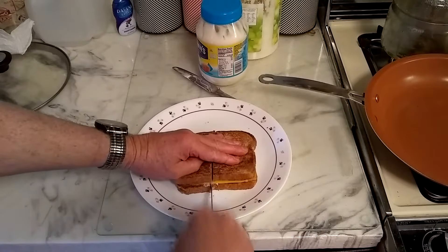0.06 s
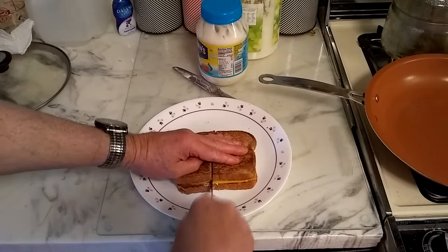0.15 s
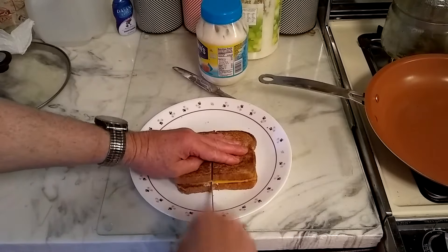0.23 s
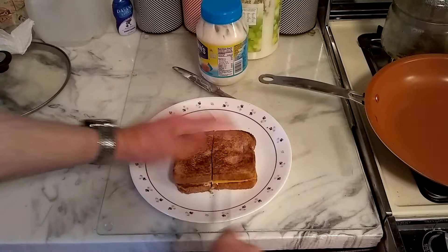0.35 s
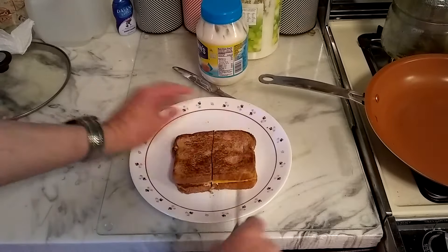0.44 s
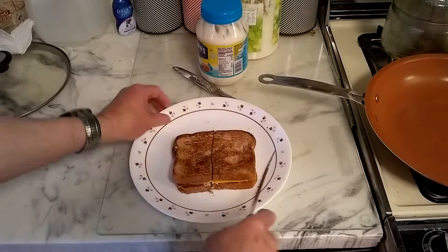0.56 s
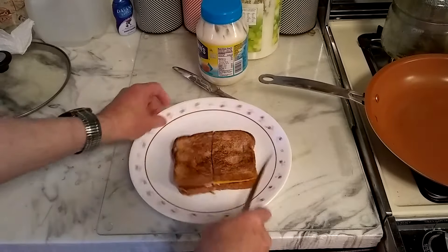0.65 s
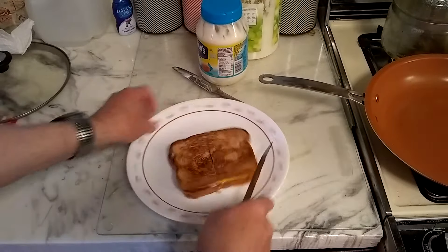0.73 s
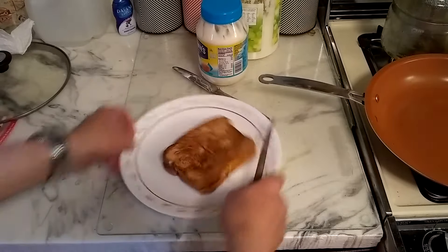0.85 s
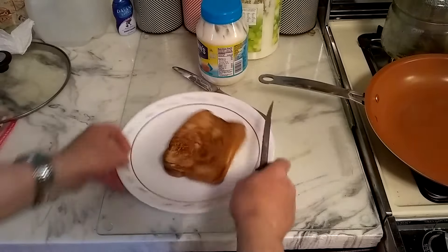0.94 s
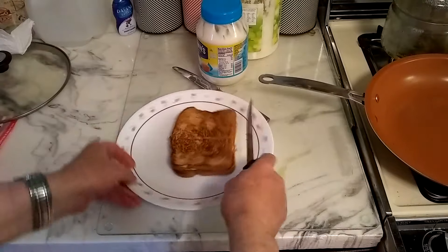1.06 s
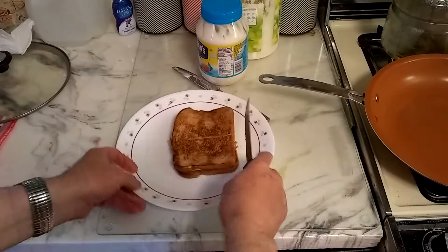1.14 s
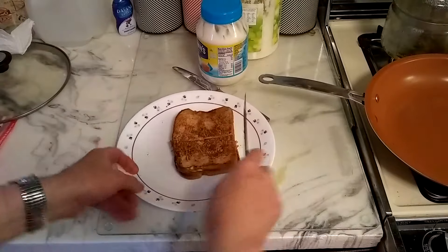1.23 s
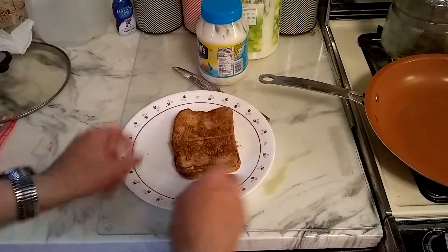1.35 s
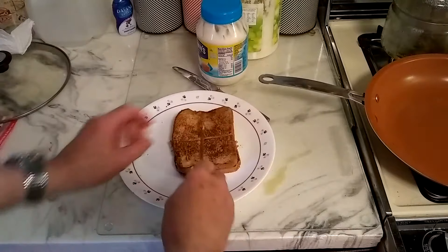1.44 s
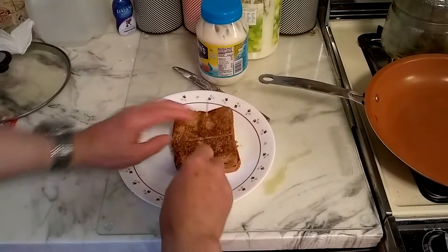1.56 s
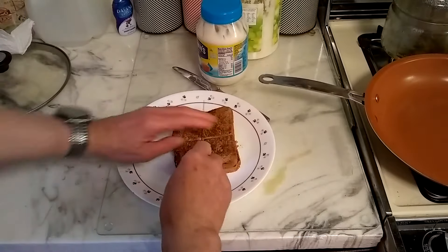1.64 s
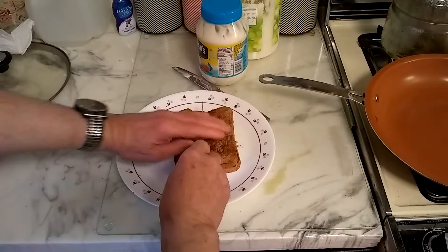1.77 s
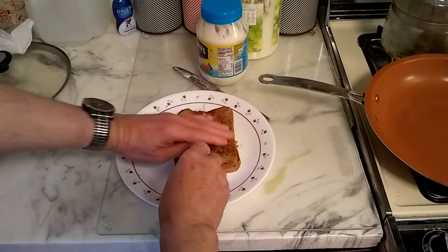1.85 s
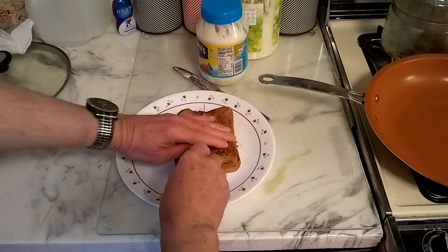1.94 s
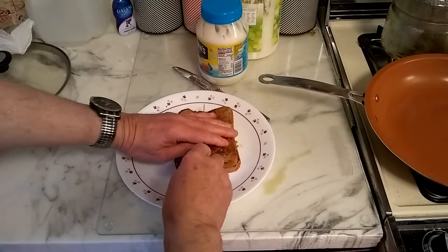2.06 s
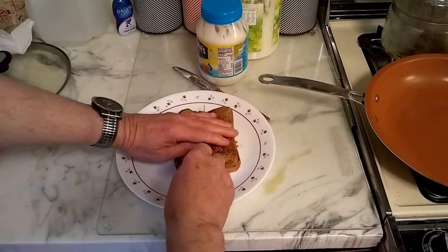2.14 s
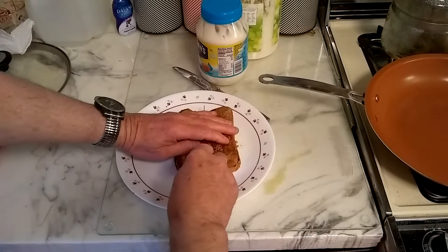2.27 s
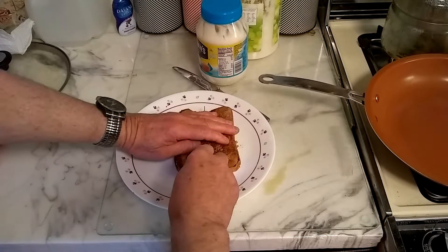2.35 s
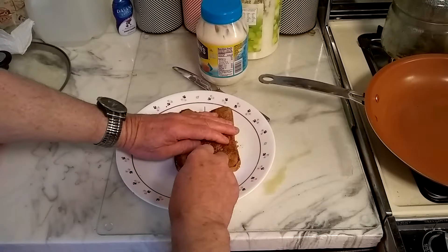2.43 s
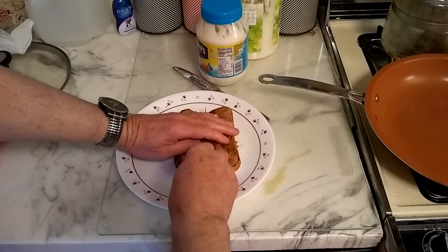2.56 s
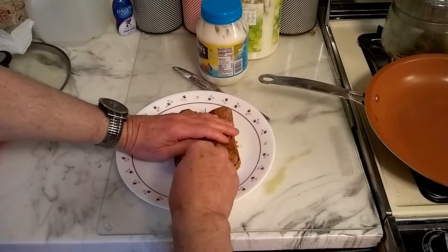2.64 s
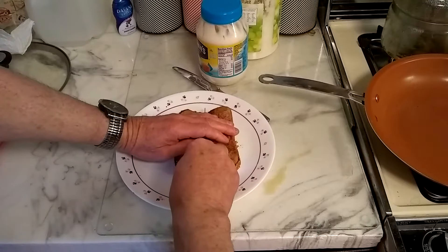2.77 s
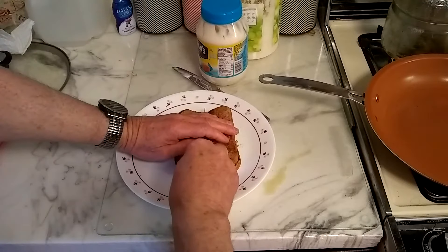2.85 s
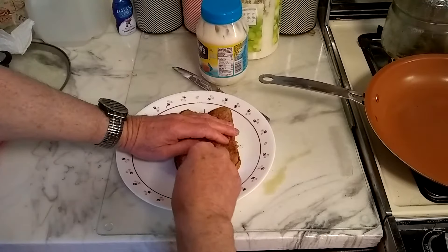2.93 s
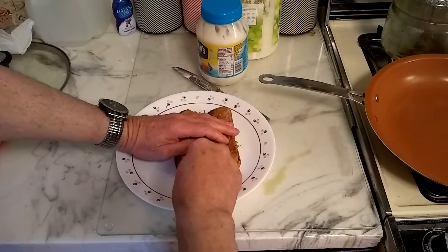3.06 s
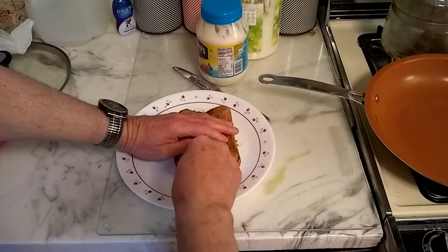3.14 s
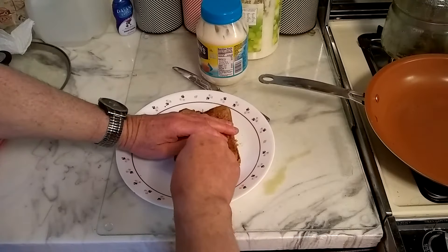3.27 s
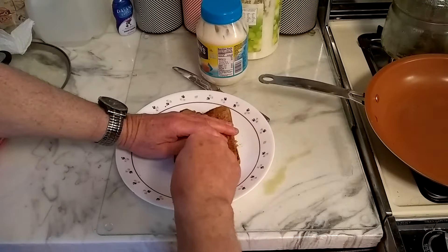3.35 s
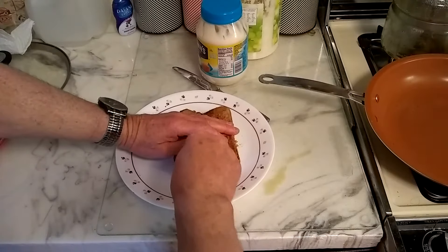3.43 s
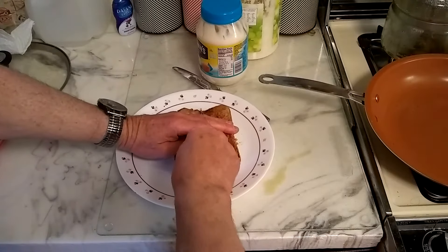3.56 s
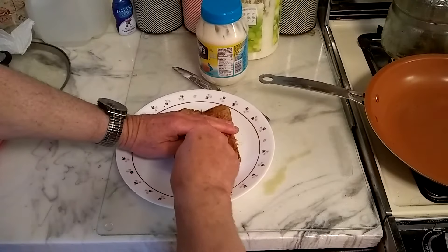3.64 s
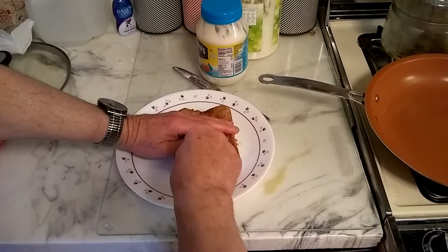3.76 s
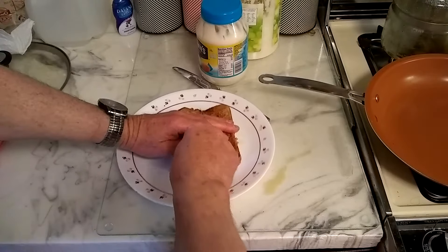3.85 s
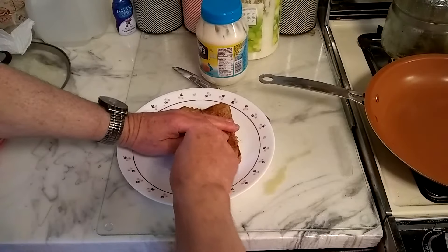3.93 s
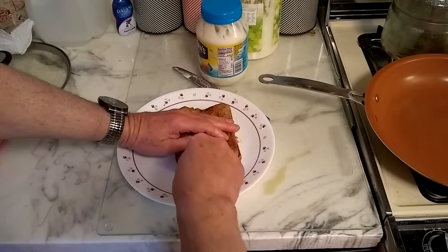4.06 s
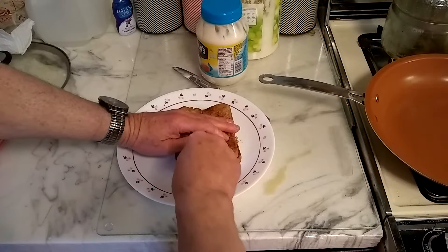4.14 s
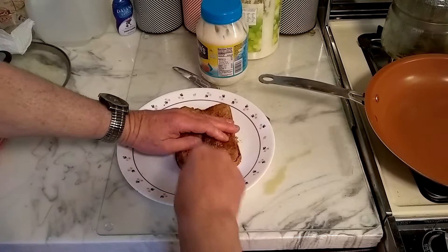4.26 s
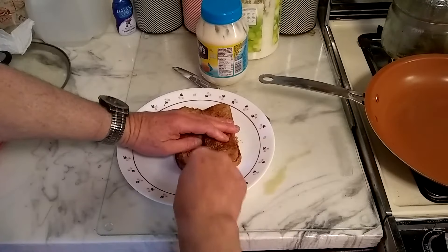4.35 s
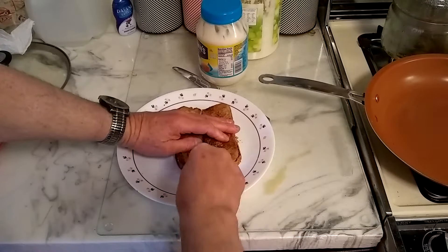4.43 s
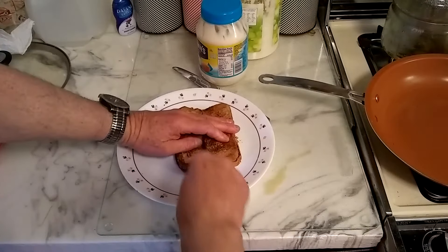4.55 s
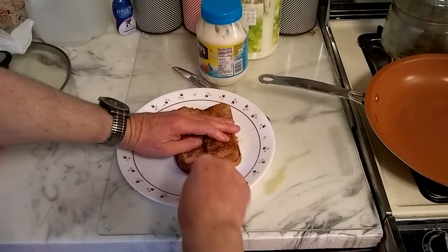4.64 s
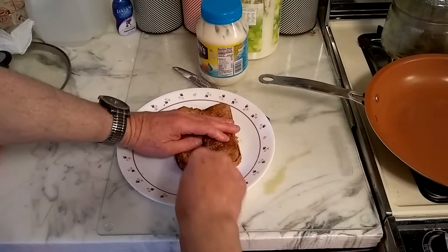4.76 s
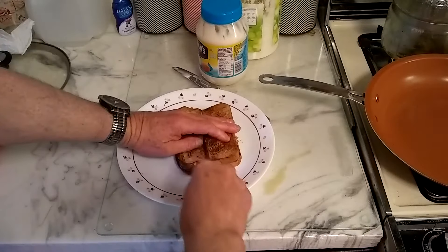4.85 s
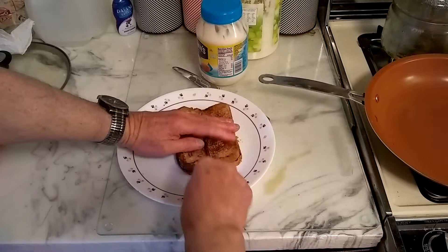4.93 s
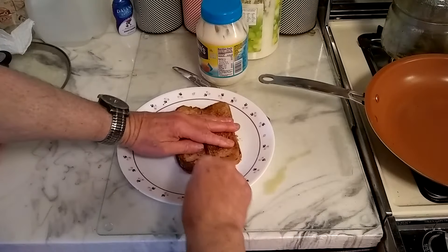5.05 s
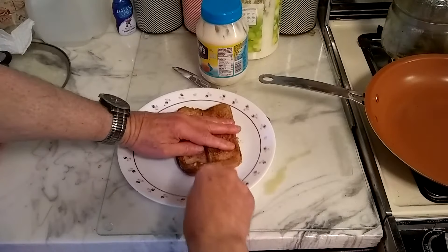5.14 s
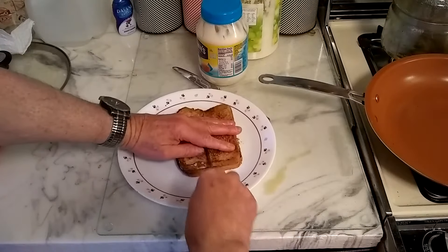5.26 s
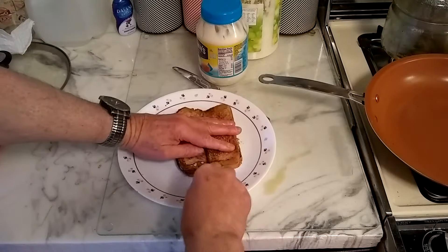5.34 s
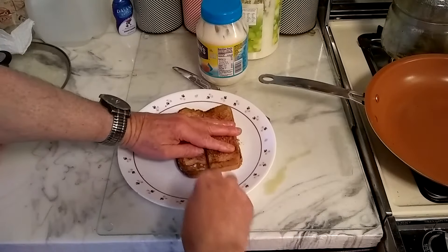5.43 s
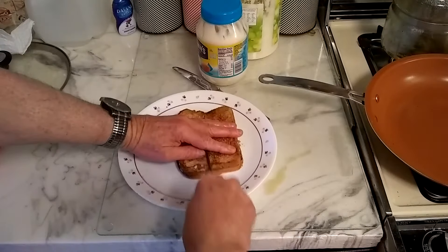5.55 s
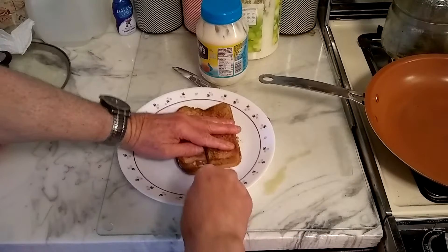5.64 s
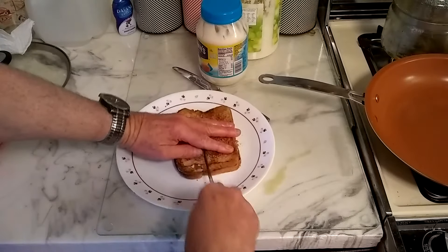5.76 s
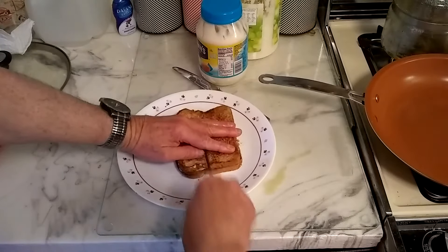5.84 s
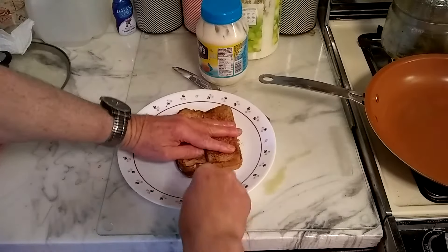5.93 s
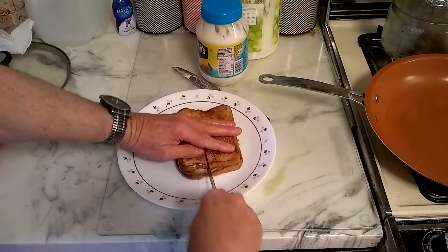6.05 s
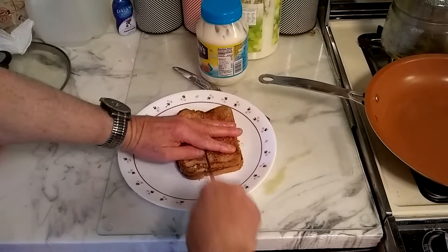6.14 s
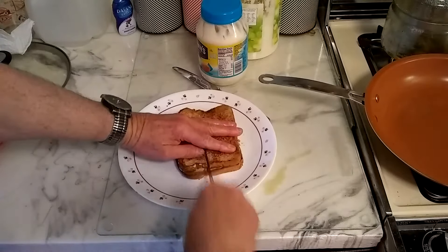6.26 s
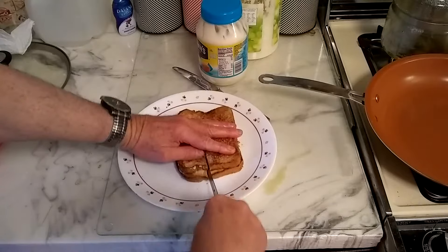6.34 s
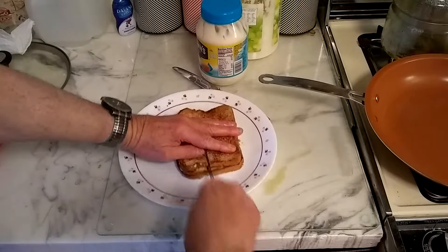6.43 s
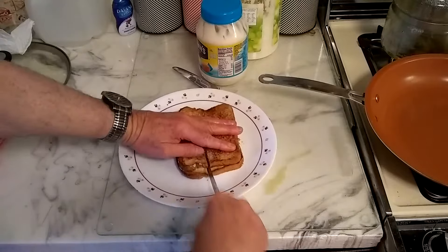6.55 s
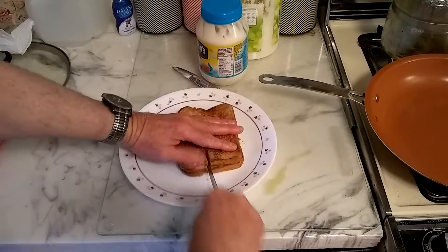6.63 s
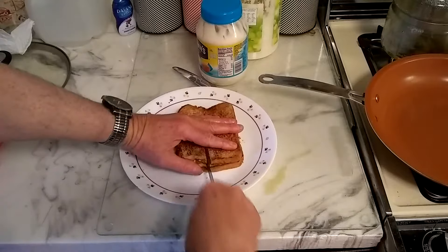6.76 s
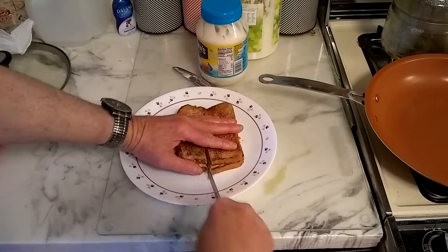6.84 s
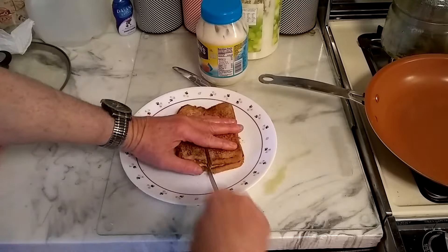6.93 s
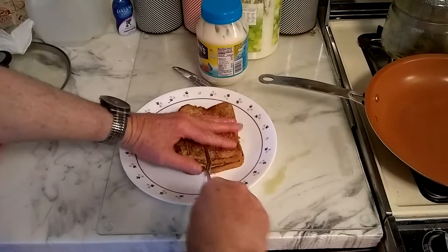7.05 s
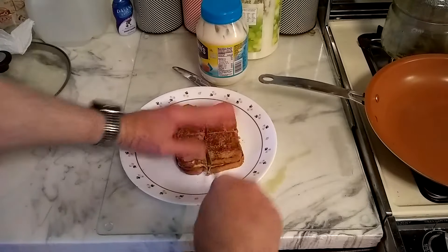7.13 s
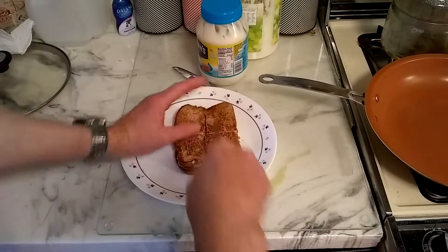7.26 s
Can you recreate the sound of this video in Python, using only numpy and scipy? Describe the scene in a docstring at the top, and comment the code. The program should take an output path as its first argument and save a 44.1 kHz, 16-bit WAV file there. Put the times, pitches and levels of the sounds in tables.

```python
"""A table knife scrapes twice across a toasted sandwich and ticks sharply on the thin plate, exciting its
modes. From 0.6 to 1.2 s the plate is turned on the stone counter, its foot ring dragging over grit.
After a lull, sawing resumes near 2.5 s and grows louder: crumbs fracture, the blade ticks on the plate,
and hand and bread damp the ringing. A last loud tick falls at 6.6 s. Throughout, an appliance hums in
the small kitchen, and a pair of microphones with gain control listens."""
import sys
import numpy as np
from scipy import signal
from scipy.fft import rfft, irfft, next_fast_len
from scipy.io import wavfile
from scipy.ndimage import uniform_filter1d

SR = 44100
rng = np.random.default_rng(int(sys.argv[2]) if len(sys.argv) > 2 else 0)


def generate_wav(signal):
    """Clip the signal to [-1, 1] and save it as 16-bit WAV at the path in sys.argv[1]."""
    frames = np.transpose(np.atleast_2d(signal))
    scaled = np.clip(frames, -1, 1) * 32767
    pcm = np.round(scaled).astype(np.int16)
    wavfile.write(sys.argv[1], SR, pcm)


N = 321489

# saw strokes: (midpoint [s], duration [s], scratch level [dB])
SAW_STROKES = [(0.057, 0.1, -52.5), (0.174, 0.093, -46.5), (1.96, 0.017, -64), (2.49, 0.16, -64),
               (2.687, 0.096, -62), (2.872, 0.14, -62.5), (3.103, 0.18, -58.5), (3.288, 0.086, -63),
               (3.464, 0.16, -59.5), (3.647, 0.15, -59.5), (3.768, 0.049, -50.5), (3.949, 0.2, -60),
               (4.085, 0.086, -54), (4.214, 0.13, -54), (4.375, 0.1, -51), (4.474, 0.16, -59),
               (4.628, 0.085, -54), (4.653, 0.018, -42.5), (4.732, 0.14, -59), (4.89, 0.072, -67),
               (5.11, 0.14, -55), (5.253, 0.085, -54.5), (5.397, 0.11, -62.5), (5.558, 0.087, -52.5),
               (5.685, 0.17, -55.5), (5.836, 0.11, -49.5), (5.991, 0.14, -47.5), (6.13, 0.07, -49.5),
               (6.247, 0.095, -48), (6.384, 0.086, -54.5), (6.493, 0.088, -55.5), (6.597, 0.077, -49),
               (6.785, 0.13, -49), (6.905, 0.069, -58.5), (6.992, 0.036, -53.5)]
# the blade sinks from dry crust toward the plate:
# (time [s], plate body re scratch [dB], crisp top re scratch [dB], share ringing free of bread [0-1])
CUT_DEPTH = [(.1, 7.5, 4.5, 0.66), (1.999, -7, 8, 0.9), (3.1, -7, 6.5, 0.3), (3.8, -1.5, 3, 0),
             (4.2, 0.5, 7, 0.16), (4.65, -0.5, 3, 0.6), (5.1, -3.5, 10.5, 0.6), (5.55, 0.7, 4, 1),
             (6.25, -1, 2, 0.96), (6.8, -4, 3, 0.9)]
# spectrum of breaking crumbs: (frequency [Hz], relative density [dB])
CRUST_SPECTRUM = [(600, -71), (1100, 1), (2100, -9.5), (3400, -3.5), (5000, -8), (7300, -8.5), (8000, -3),
                  (8700, -11.5), (11900, -13), (14400, -26)]
# blade impacts on the plate: (time [s], level [dB], thud emphasis [dB], treble emphasis [dB])
IMPACTS = [(0.216, -9, -16, 3.5), (0.443, -35.5, 13, -1), (0.5209, -45, -8, -2), (0.589, -51, 13, -9),
           (0.7046, -40, -15, 3.5), (0.915, -37, -14, 1.5), (2.458, -50, -8, 2), (3.0562, -51, -13, -1),
           (3.0924, -40.5, -7, -3), (3.098, -49, -4, -6), (3.1265, -41.5, 2, -10), (3.5073, -42, -5, -5),
           (3.7771, -23, -21, -0.5), (4.036, -37.5, -2.5, -8), (4.104, -37, 2, -17), (4.386, -31, -2, -8),
           (4.593, -47.5, 19.5, 1.5), (4.653, -23, -7, -28), (4.837, -45, -25, 7.5),
           (4.968, -51.5, -15, 4.5), (5.577, -35.5, 2, -1.5), (5.714, -44.5, 17, -10), (5.87, -36, 2, -8),
           (6.2985, -34, 0.5, -3.5), (6.571, -43, -7, 8), (6.579, -18, -15, -3.5)]
# normal modes of the plate: (frequency [Hz], level [dB], free T60 [s])
PLATE_MODES = [(433, -10, .1), (580, -10, .08), (955, -5, .12), (1240, -12, .08), (1495, -8, .12),
               (1790, -4, .1), (2850, -18, .22), (3260, -9, .2), (3700, -14, .2), (4400, -14, .2),
               (5453, -7, .2), (5740, -1, .26), (6643, -3, .17), (7463, -4, .19), (8248, -6, .24),
               (9045, -3, .18), (9890, -6, .24), (10890, -6, .24), (11961, -5, .22), (13155, -7, .08)]
# damping by the hand pressing the bread: (time [s], share of the free ring time [0-1])
HAND_DAMPING = [(.22, 0.75), (.5, 0.51), (.92, 0.68), (2.4, 0.11), (4.4, 0.49), (6.6, 0.23)]
# the plate turning on the counter: (time [s], grit hiss [dB], foot ring rumble [dB])
PLATE_TURN = [(.58, -69, -61.5), (.68, -54, -47.5), (.715, -46, -46), (.82, -43.5, -41.5),
              (.87, -50.5, -40), (.93, -49.5, -46), (.99, -62, -47), (1.05, -61.5, -66), (1.14, -61, -54),
              (1.22, -98, -69.5)]
# motor partials: (frequency [Hz], rms level [dB], waver [dB])
MOTOR_PARTIALS = [(109.3, -56.5, 1), (206.7, -68.5, 3), (237.6, -67.5, 5)]
# spectrum of the room tone: (frequency [Hz], relative density [dB])
ROOM_SPECTRUM = [(25, -41), (58, -12), (80, -21.5), (130, -14.5), (220, -5.5), (300, -7.5), (384, -1.5),
                 (474, -4), (700, -10.5), (1200, -20.5), (2200, -26), (5000, -25.5), (10000, -29.5),
                 (14400, -31.5)]
# stereo image: (frequency [Hz], sum fed to side [dB], difference fed to side [dB], left re right [dB])
STEREO_WIDTH = [(98.4, -6.5, 2.5, 0.5), (383, -6, -6.5, 0.5), (1760, -7, 1.5, 0), (2410, 0, -2, 0.7),
                (4820, -3.5, 3.2, -1), (11100, -16.5, 7, 1.5), (13700, -4, 5, 2)]

TWIN_SPLIT, TWIN_DB = .004, -5   # an uneven plate gives each mode a fainter, slightly lower twin
KITCHEN_T60_S, WALL_CUT_HZ, KITCHEN_DB = 0.32, 23000, -14
ROOM_TONE_DB, TONE_ALIKE_HZ = -51, 4270   # above this frequency both capsules get much the same tone
COMB_HZ, COMB_STRETCH, COMB_FADE_HZ = 2290, 0.97, 4630   # first notch of the sum, spacing exponent, fade
GAIN_KNEE_DB, GAIN_SLOPE, GAIN_RELEASE_DB_S, GAIN_ATTACK_S = -30, 0.53, 10, 0.0066
CUTOFF_HZ = 14480


def sawing(texture, body_db, crisp_db, free):
    """Amplitude modulation: friction noise swells, holds and stops with each stroke of the blade."""
    scratch, t = np.zeros(N), np.arange(N) / SR
    for middle, length, scratch_db in SAW_STROKES:
        near = slice(max(0, round((middle - 2 * length) * SR)), round((middle + 2 * length) * SR))
        scratch[near] += from_db(scratch_db - 11.7 * np.abs(2 * (t[near] - middle) / length) ** 2.7)
    body = np.sqrt(free) * texture["shaking"] + np.sqrt(1 - free) * texture["muffled"]
    body += from_db(-5.5) * free * texture["pressed"]
    treble = free * texture["chiming"] + from_db(crisp_db) * texture["crisp"]
    return scratch * (texture["crunch"] + treble + from_db(body_db) * body)


def friction(free):
    """Stick-slip and brittle fracture: trains of tiny impulses crunch and drive the plate's modes."""
    crumbs = coloured(slips(1800, 2.26, 2.44), CRUST_SPECTRUM)
    top = butterworth(crumbs, 7500, "high", order=4)
    crumbs -= 0.88 * free * butterworth(crumbs, 2100, "low")   # less bread to crunch near the plate
    singing = resonate(slips(5400, 1.9, 2.0), PLATE_MODES[6:], ring_share=.039)
    shaking = resonate(slips(3000, 2.5, 1.2), PLATE_MODES[2:6], ring_share=.3)
    muffled = resonate(slips(2000, 4.0, 4.6), PLATE_MODES[3:6], ring_share=.03)   # under soft bread
    chiming = resonate(slips(3700, 2.3, 1.6), PLATE_MODES[6:], ring_share=.12)   # on the bare glaze
    drag = slips(1500, 4.1, 1.0)
    foot = resonate(drag, PLATE_MODES[1:2], ring_share=.12)   # damped by the stone
    pressed = resonate(drag, PLATE_MODES[:1], ring_share=.22)   # the blade bears down
    crunch = from_db(1.5) * (crumbs - top) + from_db(-10) * singing
    return dict(crunch=crunch, crisp=from_db(1.5) * top, chiming=from_db(-12) * chiming,
                shaking=shaking, muffled=muffled, foot=foot, pressed=pressed)


def slips(per_s, spread_db, clump_db):
    """Poisson process: impulses of uneven size, growing and shrinking in clumps."""
    sizes = from_db(spread_db * np.minimum(rng.exponential(1, N), 5) + clump_db * drift(41.0))
    return sizes * rng.choice([-1, 1], N) * (rng.random(N) < per_s / SR)


def resonate(force, modes, ring_share):
    """Forced vibration: each mode is a damped oscillator that keeps a share of its free ring time."""
    out = np.zeros(N)
    for k, (hz, level_db, t60) in enumerate(modes):
        r, w = from_db(-60 / (t60 * ring_share * SR)), 2 * np.pi * hz / SR
        drive = (-1) ** k * from_db(level_db) * np.sin(w)
        out += signal.lfilter([0, drive], [1, -2 * r * np.cos(w), r * r], force + 1e-18)
    return rms_one(out)


def blade_ticks():
    """Impact excitation: each touch gives a crack, a dull scuff and the free decay of beating modes."""
    out, t = np.zeros(N + SR), np.arange(SR // 2) / SR
    hz, level_db, t60 = np.transpose(PLATE_MODES + PLATE_MODES)[:, :, None]
    is_twin = np.repeat([[0], [1]], len(PLATE_MODES), axis=0)
    hz = hz * (1 - TWIN_SPLIT * is_twin)
    level_db = level_db + TWIN_DB * is_twin
    chance = rng.standard_normal((len(IMPACTS), 2, len(hz), 1))
    noise = rng.standard_normal((len(IMPACTS), len(t)))
    bright = butterworth(noise, [4000, 10500], "band")
    dull = butterworth(noise[::-1], [1300, 3200], "band")
    scuffs = butterworth(noise, [380, 800], "band")
    for k, (start, impact_db, thud_db, treble_db) in enumerate(IMPACTS):
        strength, phase = chance[k]
        ring_share = np.interp(start, *np.transpose(HAND_DAMPING))
        emphasis_db = (thud_db + 2) * (hz < 2000) + (treble_db + 0.5) * (hz > 5000)
        gain = from_db(level_db + 1.6 * strength + emphasis_db - 60 * t / (t60 * ring_share))
        ringing = np.sum(gain * np.sin(2 * np.pi * hz * t + 2 * phase), axis=0)
        # a plate held down cracks duller
        crack = from_db(treble_db - 2.5) * bright[k] + (1 - ring_share) * from_db(4.5) * dull[k]
        snap = from_db(22 - 60 * t / 0.013) * crack
        faint_modes = from_db(12.5 - 60 * t / (0.15 * ring_share)) * crack
        thud = from_db(thud_db + 19 - 60 * t / (0.1 + 0.17 * ring_share)) * scuffs[k]
        onset = from_db(impact_db - 19) * np.minimum(t / 0.00012, 1)
        at = round(start * SR)
        out[at:at + len(t)] += onset * (ringing + snap + faint_modes + thud)
    return out[:N]


def plate_turning(texture):
    """Sliding friction: grit cracks under the foot ring and shakes the plate's high and low modes."""
    grit, rumble = from_db(in_time(PLATE_TURN, outside=-120))
    treble = 0.45 * texture["chiming"] + from_db(2) * texture["crisp"]
    body = from_db(0.5) * texture["shaking"]
    return grit * (texture["crunch"] + treble + body) + rumble * texture["foot"]


def near_echoes(x, count=4):
    """Early reflections: hands, counter and jars return echoes that change as the hands move."""
    size = round(.008 * SR)
    taps = rng.standard_normal((count, 2, size)) * from_db(-60 * np.arange(size) / SR / 0.0073)
    taps /= np.sqrt(np.sum(taps ** 2, axis=2, keepdims=True))
    shares = np.array([drift(5.27) for _ in range(count)])
    shares /= np.sqrt(np.sum(shares ** 2, axis=0))
    return sum(signal.oaconvolve((x * share)[None], pair, axes=1)[:, :N]
               for share, pair in zip(shares, taps))


def kitchen(x):
    """Reverberation: eight feedback delays a side, dulled by wall absorption on every round."""
    size = next_fast_len(N + SR // 2)
    w = 2 * np.pi * np.arange(size // 2 + 1) / size
    walls = 1 / (1 + 1j * w * SR / (2 * np.pi * WALL_CUT_HZ))
    response = np.zeros((2, len(w)), complex)
    for k, lag in enumerate(rng.uniform(.006, .03, 16)):
        loop = from_db(-60 * lag / KITCHEN_T60_S) * walls * np.exp(-1j * w * round(lag * SR))
        response[k % 2] += loop / (1 - loop) * (-1) ** (k // 2)
    return irfft(rfft(x, size) * response, size)[:, :N]


def appliance_hum():
    """Line spectrum of a motor: partials waver in level and phase, the upper ones most."""
    out, t = np.zeros(N), np.arange(N) / SR
    for hz, level_db, waver_db in MOTOR_PARTIALS:
        amplitude = np.sqrt(2) * from_db(level_db + waver_db * drift(10.0))
        out += amplitude * np.sin(2 * np.pi * hz * t + 0.28 * waver_db * drift(2.54))
    return out


def room_tone():
    """Partial coherence: background noise whose two sides grow alike toward the treble."""
    alike, apart = coloured(rng.standard_normal((2, N)), ROOM_SPECTRUM)
    apart = butterworth(apart, TONE_ALIKE_HZ, "low", order=1)
    return from_db(ROOM_TONE_DB + drift(12.7)) * np.array([alike + apart, alike - apart]) / np.sqrt(2)


def capsules(dry):
    """Interference: delayed cross-feed combs the pair's sum and difference a quarter cycle apart."""
    size = next_fast_len(N + 4096)
    hz = np.maximum(np.arange(size // 2 + 1) * SR / size, 1)
    tied_db, own_db, balance_db = in_frequency(STEREO_WIDTH, hz)
    common, apart = rfft([dry[0] + dry[1], dry[0] - dry[1]], size) / 2
    feed = 1 / (1 + (hz / COMB_FADE_HZ) ** 6)
    side_phase = np.pi * (hz / COMB_HZ) ** COMB_STRETCH
    mid_phase = np.maximum(side_phase, np.pi / 2)   # keeps the bass of the sum level
    mid = -1j * (np.exp(1j * mid_phase) - feed * np.exp(-1j * mid_phase)) * common
    side_comb = 1j * (np.exp(1j * side_phase) + feed * np.exp(-1j * side_phase))
    side = side_comb * (from_db(tied_db) * common + from_db(own_db) * apart)
    balance_db *= np.abs(np.sin(mid_phase))   # the sides are level at the notches of the sum
    pair = np.array([mid + side, mid - side]) * from_db([balance_db / 2, -balance_db / 2])
    return irfft(pair / np.sqrt(2 + 2 * feed ** 2), size)[:, :N]


def gain_control(x):
    """Dynamic compression: loud moments pull the gain down fast; it climbs back at a steady rate."""
    level_db = 10 * np.log10(uniform_filter1d(np.mean(x ** 2, axis=0), size=441) + 1e-12)
    climb = GAIN_RELEASE_DB_S * np.arange(N) / SR
    cut_db = np.maximum.accumulate(GAIN_SLOPE * np.maximum(level_db - GAIN_KNEE_DB, 0) + climb) - climb
    r = np.exp(-1 / (GAIN_ATTACK_S * SR))
    return x * from_db(-signal.lfilter([1 - r], [1, -r], cut_db))


def drift(rate_hz):
    """Random modulation: coarse noise through a double one-pole low-pass, at unit rms."""
    r = np.exp(-80 * np.pi * rate_hz / SR)
    slow = signal.lfilter([1], [1, -2 * r, r * r], rng.standard_normal(N // 40 + 2002))[2000:]
    return np.interp(np.arange(N) / 40, np.arange(len(slow)), rms_one(slow))


def coloured(x, spectrum):
    """Spectral shaping: white sound takes on the given spectrum, at unit rms."""
    size = next_fast_len(N)
    hz = np.maximum(np.arange(size // 2 + 1) * SR / size, 1)
    gain = from_db(in_frequency(spectrum, hz)[0])
    return rms_one(irfft(rfft(x, size) * gain, size)[..., :N])


def butterworth(x, hz, kind, order=2):
    """Filtering with a maximally flat passband."""
    return signal.sosfilt(signal.butter(order, hz, kind, fs=SR, output="sos"), x)


def in_time(rows, outside=None):
    """Linear interpolation of each column at every sample."""
    times, *columns = np.transpose(rows)
    return [np.interp(np.arange(N) / SR, times, c, left=outside, right=outside) for c in columns]


def in_frequency(rows, hz):
    """Interpolation of each column on a log-frequency axis."""
    points, *columns = np.transpose(rows)
    return [np.interp(np.log(hz), np.log(points), c) for c in columns]


def from_db(db):
    """Decibels to amplitude ratio."""
    return 10 ** (np.asarray(db) / 20)


def rms_one(x):
    """Normalisation to unit rms."""
    return x / np.sqrt(np.mean(x ** 2) + 1e-20)


def scene():
    """Superposition: knife and plate with their reflections, over room tone and hum."""
    body_db, crisp_db, free = in_time(CUT_DEPTH)
    texture = friction(free)
    plate = sawing(texture, body_db, crisp_db, free) + blade_ticks() + plate_turning(texture)
    plate = butterworth(plate, 250, "high")   # a small plate radiates little bass
    tone = room_tone()
    reflections = from_db(-1.5) * near_echoes(plate) + from_db(KITCHEN_DB) * kitchen(plate)
    return plate + reflections + tone + appliance_hum()


def record(dry):
    """Transduction: capsules, gain control, then a steep low-pass."""
    low_pass = signal.cheby2(18, 50, CUTOFF_HZ, fs=SR, output="sos")
    return signal.sosfilt(low_pass, gain_control(capsules(dry)))


dry = scene()
out = record(dry)
generate_wav(out)
```